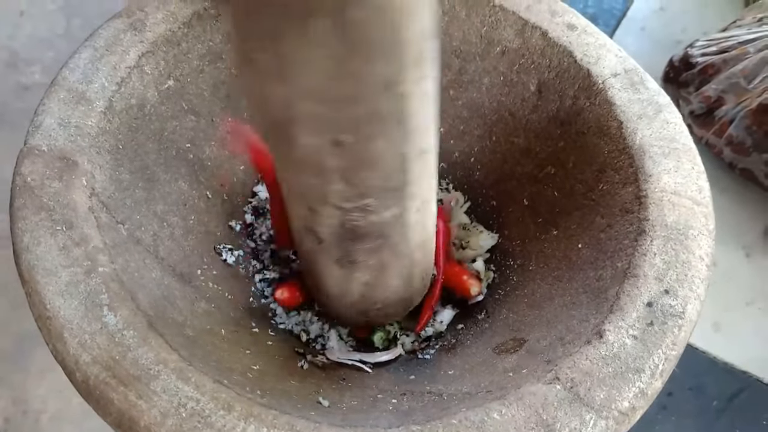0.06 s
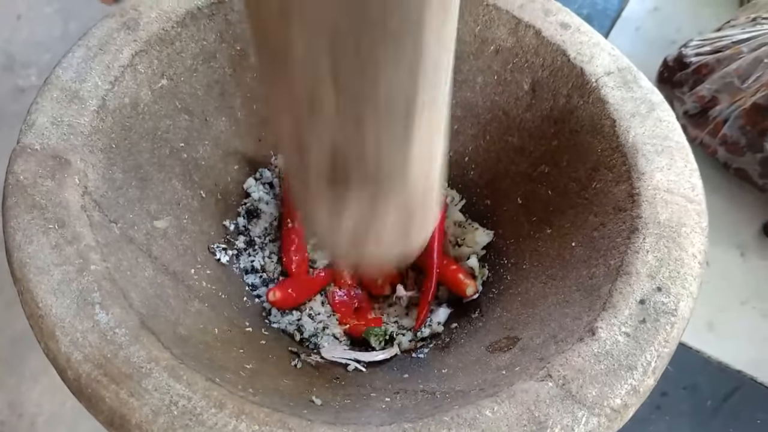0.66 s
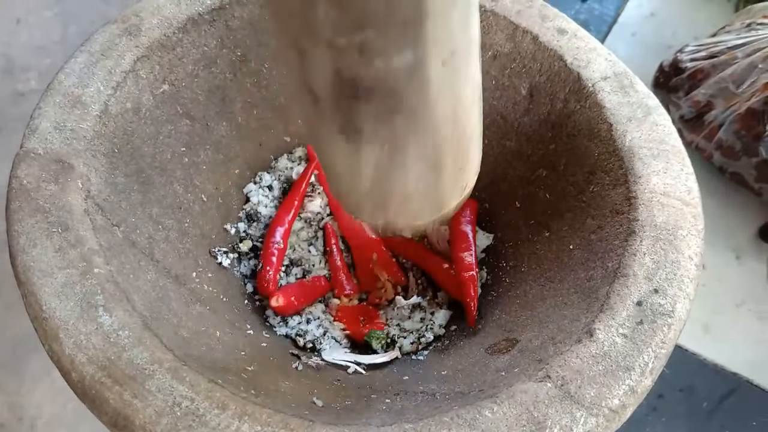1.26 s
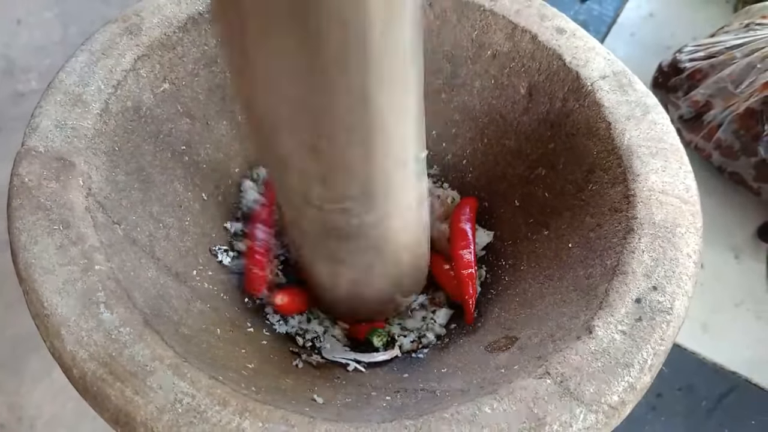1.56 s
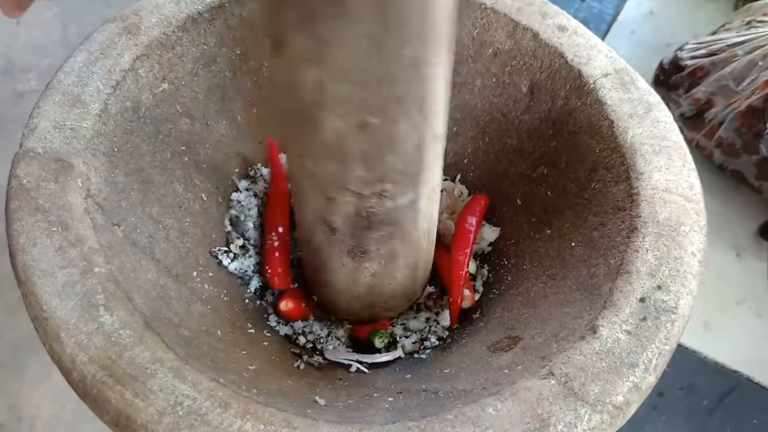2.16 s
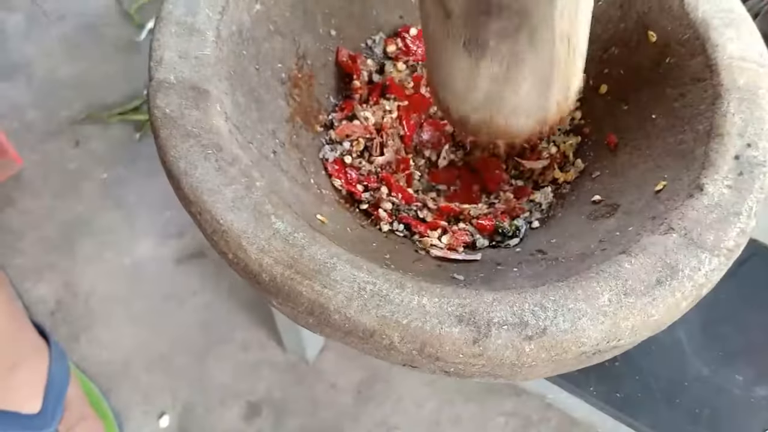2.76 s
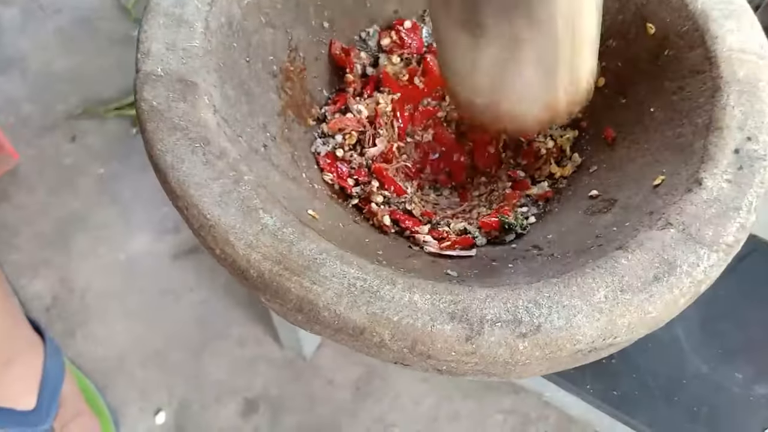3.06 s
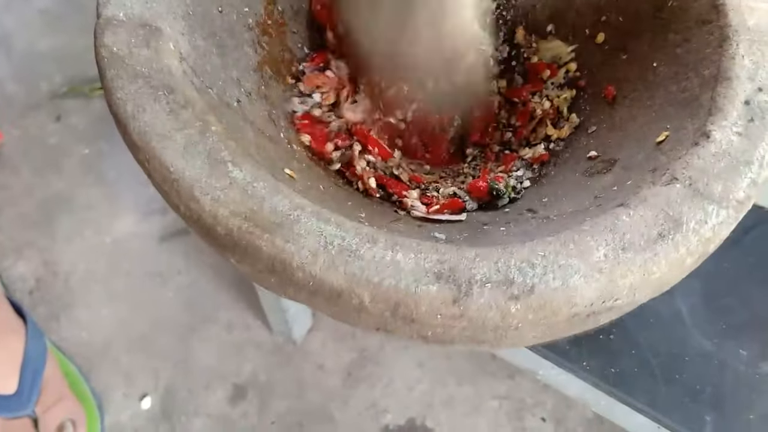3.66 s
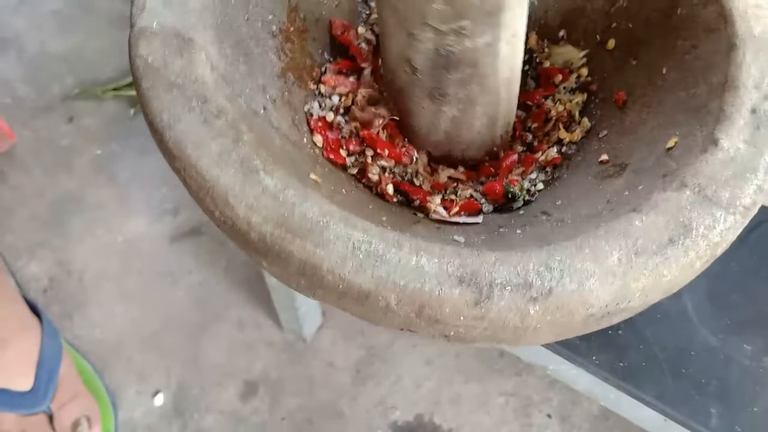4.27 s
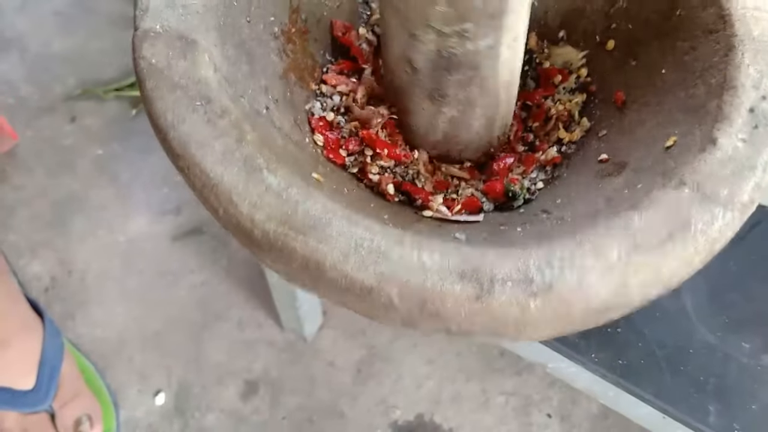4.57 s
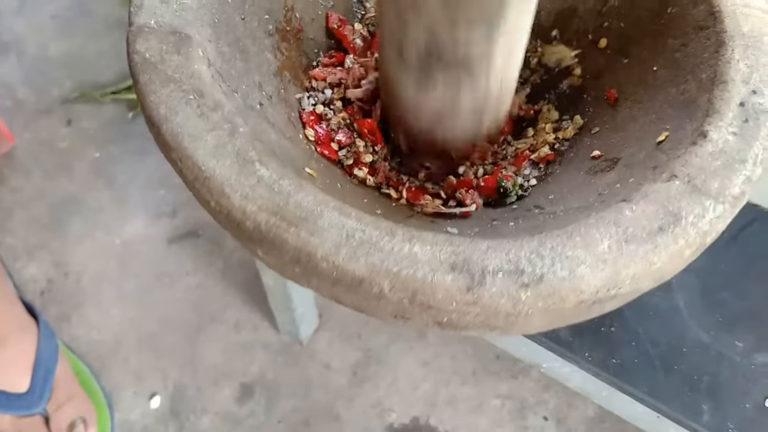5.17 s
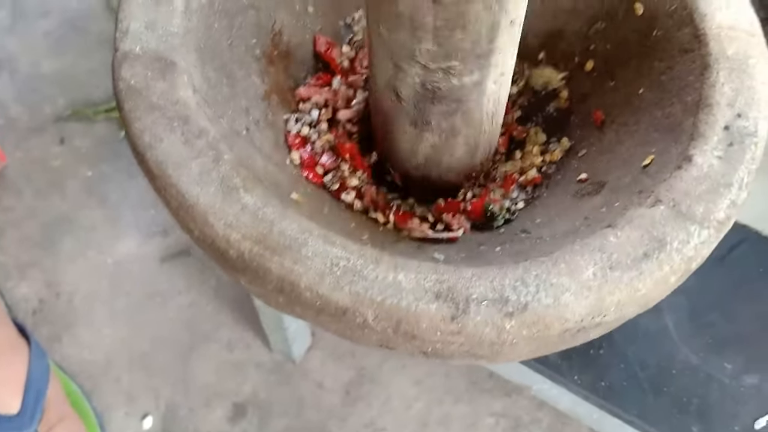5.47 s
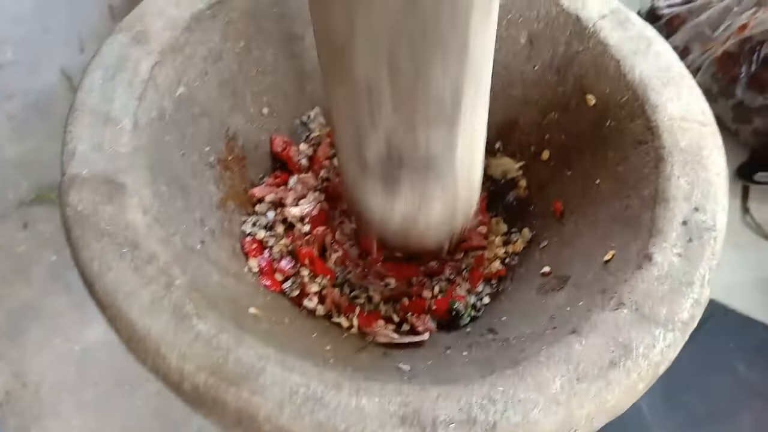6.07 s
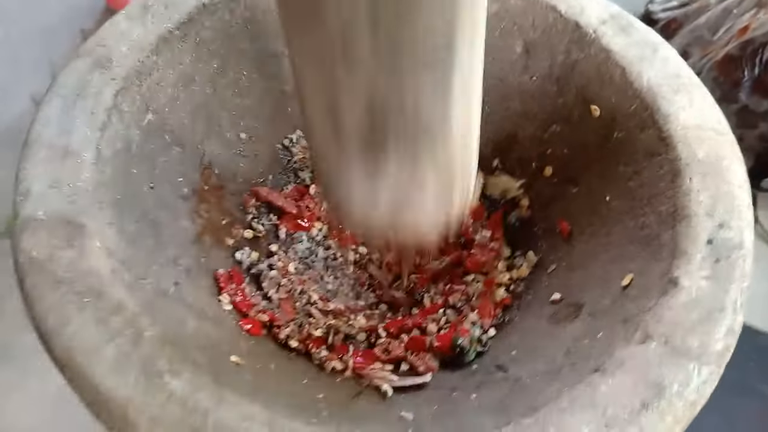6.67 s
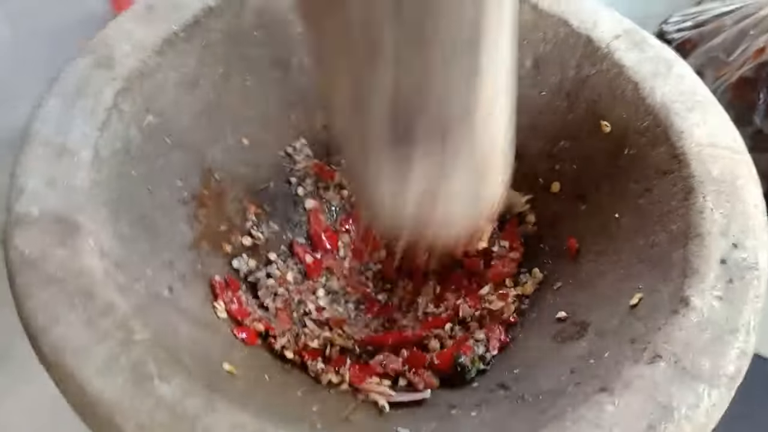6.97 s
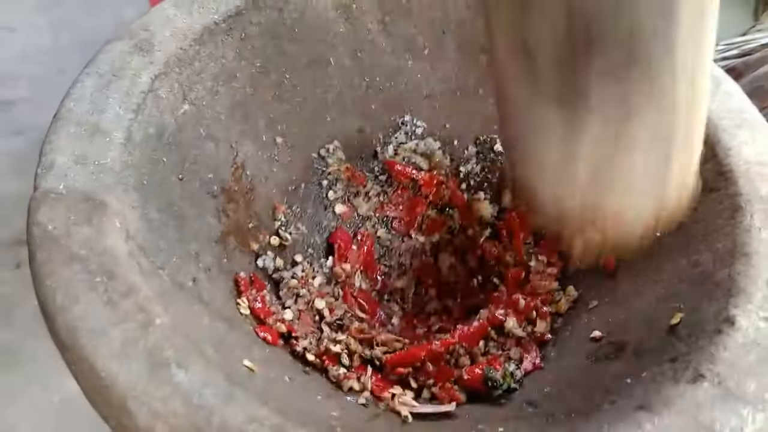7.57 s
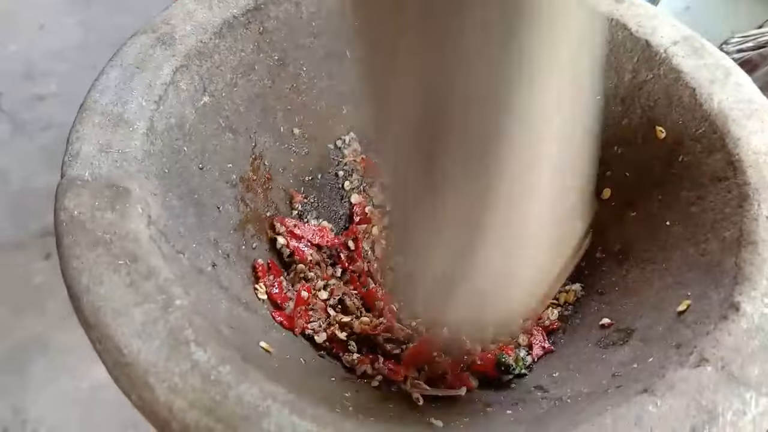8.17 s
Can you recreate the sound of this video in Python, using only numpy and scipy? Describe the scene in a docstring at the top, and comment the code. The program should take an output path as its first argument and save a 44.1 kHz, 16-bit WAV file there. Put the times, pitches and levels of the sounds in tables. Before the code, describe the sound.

Steady, quick thuds of a pestle in a stone mortar are heard up close, with a little kitchen echo. At first, chillies and garlic burst with juicy crunches while a faint bird whistles outdoors. From about three seconds in, the pulp squelches, smacks and crackles off the rising pestle. Some strokes clack on stone and others land cushioned. The wet pestle squeaks faintly once near six seconds, and the pounding carries on.

```python
"""A heavy pestle pounds chillies and garlic in a stone mortar, close by in an airy kitchen.
During the first second a bird whistles outside. Each stroke bursts the pulp with a wet crunch and a
dull thud, sinks through it and bottoms out. From 2.5 s the paste smacks as the pestle twists and lifts.
From 3.3 s the pods are mash: it crackles off the rising pestle, and the mortar rocks on its stand.
Near 6 s the wet pestle squeaks once."""
import sys
import numpy as np
from scipy import signal
from scipy.fft import rfft, irfft
from scipy.io import wavfile
from scipy.ndimage import uniform_filter1d

SR = 44100
rng = np.random.default_rng(int(sys.argv[2]) if len(sys.argv) > 2 else 0)


def dump(signal):
    """Clip the signal to [-1, 1] and save it as 16-bit WAV at the path in sys.argv[1]."""
    limited = np.clip(np.atleast_2d(signal).T, -1, 1)
    pcm = np.round(limited * 32767).astype(np.int16)
    wavfile.write(sys.argv[1], SR, pcm)


N = 367353
AGE_S = np.arange(SR // 3) / SR   # time since a contact
MASH_FROM_S = 3.3

# pestle strokes: start_s, thud_db, knock_db, clack_db, crunch_db, sink_s, bottom_re_landing_db
STROKES = [(0.066, -13, -17.5, -16, -24.5, 0.019, -10), (0.329, -20.5, -27, -31.5, -31, 0.022, -6.5),
           (0.612, -21, -47, -43, -25.5, 0.01, -13), (0.867, -21.5, -29, -33, -24.5, 0.014, -9),
           (1.132, -17, -21.5, -20.5, -24.5, 0.02, -44), (1.369, -20, -28.5, -32.5, -27.5, 0.041, -20),
           (1.643, -17, -22.5, -21, -23, 0.018, -19), (1.91, -18.5, -24.5, -27.5, -25, 0.02, -0.5),
           (2.176, -23, -35, -29.5, -25, 0.015, -18), (2.443, -25.5, -55, -26.5, -27.5, 0.012, -41),
           (2.708, -16, -25.5, -26, -25.5, 0.018, -15), (3.005, -16.5, -20.5, -21.5, -24.5, 0.007, 2),
           (3.402, -19, -27.5, -31.5, -21.5, 0.02, 0.5), (3.688, -16.5, -25, -30, -30.5, 0.027, -6.5),
           (3.964, -18, -20, -24.5, -25, 0.021, -9), (4.257, -23.5, -34, -36.5, -29, 0.027, 8.5),
           (4.544, -21.5, -34, -48, -29.5, 0.037, 4), (4.81, -17, -23, -27.5, -27, 0.024, -7),
           (5.102, -15, -23.5, -23.5, -33.5, 0.015, -5.5), (5.371, -17, -23, -21, -24, 0.0084, -37),
           (5.665, -27.5, -41.5, -67, -25.5, 0.013, 7), (5.959, -22, -38, -53, -28.5, 0.023, 4.5),
           (6.247, -16, -27, -39, -24, 0.018, -41.5), (6.542, -17, -21.5, -25.5, -23, 0.016, -18),
           (6.81, -18, -24.5, -54, -26.5, 0.02, -6.5), (7.109, -20.5, -32.5, -33.5, -23.5, 0.02, -1),
           (7.368, -18, -23.5, -25, -23, 0.039, -4), (7.638, -23.5, -25, -17, -51, 0.024, -7),
           (7.954, -16.5, -33, -31.5, -26, 0.033, -13), (8.22, -15.5, -21, -22, -28, 0.015, -9.5)]
# mortar on its stand: pitch_hz, level_db, t60_s
STAND_MODES = [(110.8, -33.5, 0.85), (131, -12, 0.32), (192.8, 1.5, 0.16), (202.6, 11.5, 0.084),
               (233.6, -0.5, 0.16)]
# hollow under the pestle: freq_hz, gain_db
SQUELCH_SPECTRUM = [(1300, -8.5), (2100, 0.5), (2900, 4), (4500, -15), (7000, -28)]
# spitting juice: freq_hz, gain_db
SPIT_SPECTRUM = [(1500, -1), (3600, -1), (4800, 4.5), (5800, 4), (6800, -13), (9300, -27.5), (11000, -19),
                 (11900, -22), (13100, -13), (15000, -28)]
# shading of the far microphone port: freq_hz, gain_db
PORT_SHADE = [(200, -2.5), (900, 2.5), (2700, -10), (3800, -17.5), (5500, -26.5), (8000, -12), (13000, -19)]


def from_db(db):
    return 10 ** (np.asarray(db) / 20)


def impulse_response(spectrum, size=1024):
    """Minimum-phase response of (freq_hz, gain_db) points, joined on a log-frequency axis."""
    hz, db = np.transpose(spectrum)
    gain_db = np.interp(np.log(np.fft.rfftfreq(size, 1 / SR) + 1), np.log(hz), db)
    cepstrum = irfft(np.log(from_db(gain_db)))
    cepstrum[1:size // 2] *= 2
    cepstrum[size // 2 + 1:] = 0
    return irfft(np.exp(rfft(cepstrum)))


def through(x, response):
    return signal.oaconvolve(x, response)[:len(x)]


def add(track, start_s, sound, level_db):
    """Mix in a sound with its loudest 3 ms at level_db."""
    start = max(round(start_s * SR), 0)
    peak = np.sqrt(2 * uniform_filter1d(sound ** 2, 130).max())
    track[start:start + len(sound)] += (from_db(level_db) * sound / peak)[:max(N - start, 0)]


def waver(progress, knots):
    """Random line segments over progress 0..1."""
    return np.interp(progress, np.linspace(0, 1, knots), rng.standard_normal(knots))


def grains(spread_db):
    """Tiny fractures of uneven size; rms 1."""
    x = rng.standard_normal(len(AGE_S)) * from_db(spread_db * rng.standard_normal(len(AGE_S)))
    return x / x.std()


def ringing(modes, scatter_db, detune, phase_rad=0):
    """Decaying modes; strength and pitch vary with the spot struck and the pestle's load."""
    hz, db, t60_s = np.transpose(modes)[:, :, None]
    hz = hz * (1 + detune * rng.standard_normal(hz.shape))
    db = db + scatter_db * rng.standard_normal(db.shape)
    return np.sum(from_db(db - 60 * AGE_S / t60_s) * np.cos(2 * np.pi * hz * AGE_S + phase_rad), axis=0)


def echo_cloud(t60_s, build_s=0.0015):
    """Dense echoes that build and die away, no one pitch standing far out; unit energy."""
    envelope = from_db(-60 * AGE_S / t60_s) * (1 - np.exp(-(AGE_S / build_s) ** 2))
    spectrum = rfft(rng.standard_normal(len(AGE_S)) * np.sqrt(envelope))
    flattened = spectrum / np.sqrt(np.abs(spectrum) + 1e-9)
    echoes = irfft(flattened, len(AGE_S)) * np.sqrt(envelope)
    return echoes / np.linalg.norm(echoes)


def two_ports(left, other, alike_below_hz, apart_db):
    """Two close ports share most of a diffuse field's bass and differ in its treble."""
    bass = signal.butter(1, alike_below_hz, fs=SR)
    treble = signal.butter(1, alike_below_hz, "high", fs=SR)
    return left, signal.lfilter(*bass, left + from_db(apart_db) * other) + signal.lfilter(*treble, other)


def background(level_db=-58.5):
    """Steady low noise; being diffuse, it is shaded by half as many dB at the far port."""
    # kitchen air: freq_hz, gain_db
    air_spectrum = [(18, -18), (30, -9.5), (195, -12), (274, -25.5), (538, -25), (1440, -29.5), (2490, -27),
                    (5580, -38.5), (9390, -54.5), (15000, -51)]
    colour = impulse_response(air_spectrum, size=8192)
    noises = [through(rng.standard_normal(N), colour) for _ in range(2)]
    left, right = two_ports(*noises, alike_below_hz=540, apart_db=-8)
    half_shade = impulse_response([(hz, db / 2) for hz, db in PORT_SHADE])
    air = np.array([left, through(right, half_shade)])
    return from_db(level_db) * air / air.std()


def bird(waver_hz=45, overtone_db=-24, yard_t60_s=0.29):
    """Wavering whistles slide and settle on a pitch, smeared by yard echoes."""
    # whistles: start_s, length_s, start_hz, end_hz, level_db
    notes = [(0.137, 0.044, 2810, 2140, -44), (0.353, 0.093, 2646, 2463, -46),
             (0.45, 0.075, 3450, 4160, -46), (0.507, 0.1, 2410, 2317, -39),
             (0.721, 0.02, 4580, 3290, -45.5), (0.735, 0.032, 2730, 2623, -40),
             (0.83, 0.095, 3580, 4070, -47.5), (0.922, 0.079, 2250, 2457, -39)]
    out = np.zeros(N)
    for start_s, length_s, start_hz, end_hz, level_db in notes:
        progress = np.minimum(AGE_S / length_s, 1)
        pitch_hz = end_hz + (start_hz - end_hz) * (1 - progress) ** 2 + waver_hz * waver(progress, 60)
        phase = 2 * np.pi * np.cumsum(pitch_hz) / SR
        tone = np.sin(phase) + from_db(overtone_db) * np.sin(2 * phase)
        add(out, start_s, np.sin(np.pi * progress) * tone, level_db)
    return out + through(out, echo_cloud(yard_t60_s))


def reflections(early_t60_s=0.097, late_t60_s=0.29):
    """Early cloud from bowl, floor and near wall; weaker tail from the room."""
    # reflected sound: freq_hz, early_db, late_db
    echo_spectra = [(205, -11, -16), (343, 7, -4.5), (825, -1.5, -9), (2250, -8.5, -9.5),
                    (13600, -6.5, -15)]
    early = impulse_response([(hz, db) for hz, db, _ in echo_spectra])
    late = impulse_response([(hz, db) for hz, _, db in echo_spectra])
    return through(echo_cloud(early_t60_s), early) + through(echo_cloud(late_t60_s), late)


def room(dry, stretches=10):
    """The hand-held microphone wanders, so each stretch has its own reflections."""
    wet = np.zeros((2, N + len(AGE_S)))
    for stretch in np.array_split(np.arange(N), stretches):
        responses = two_ports(reflections(), reflections(), alike_below_hz=640, apart_db=-6)
        for side, response in zip(wet, responses):
            echoes = signal.fftconvolve(dry[stretch], response)
            side[stretch[0]:stretch[0] + len(echoes)] += echoes
    return wet[:, :N]


def squeak(start_s=6.068, length_s=0.041, pitch_hz=2550, waver_hz=90, level_db=-42):
    """The wet pestle squeaks once against the bowl."""
    out = np.zeros(N)
    progress = np.minimum(AGE_S / length_s, 1)
    phase = 2 * np.pi * np.cumsum(pitch_hz + waver_hz * waver(progress, 20)) / SR
    add(out, start_s, np.sin(np.pi * np.sqrt(progress)) * np.sin(phase), level_db)
    return out


def peeling(level_db=-38, lag_s=0.042, peel_s=0.075, clump_db=7):
    """Mash crackles in clumps as it peels off the rising pestle."""
    out = np.zeros(N)
    squelch, spit = impulse_response(SQUELCH_SPECTRUM), impulse_response(SPIT_SPECTRUM)
    patter = squelch / squelch.std() + from_db(-9.5) * spit / spit.std()
    for start_s, *_ in STROKES:
        clumps = uniform_filter1d(rng.standard_normal(len(AGE_S)), size=300)
        envelope = from_db(clump_db * clumps / clumps.std()) * np.exp(-(AGE_S / peel_s) ** 2)
        crackle = np.tanh(grains(spread_db=15) / 10) * envelope
        if start_s > MASH_FROM_S:
            add(out, start_s + lag_s, through(crackle, patter), level_db)
    return out


def stand_thud(cushion_s, scatter_db, detune):
    """A cushioned push rings the mortar on its stand."""
    push = np.exp(-.5 * (AGE_S / cushion_s - np.pi) ** 2)
    return through(push, ringing(STAND_MODES, scatter_db, detune))


def rocking(settle_s=0.1, re_stroke_db=-24):
    """Pounding the mash tips the mortar; it settles back with a faint thud."""
    out = np.zeros(N)
    for start_s, thud_db, *_ in STROKES:
        thud = stand_thud(cushion_s=0.00052, scatter_db=2, detune=0.015)
        lag_s = settle_s * (1 + 0.151 * rng.standard_normal())
        if start_s > MASH_FROM_S:
            add(out, start_s + lag_s, thud, thud_db + re_stroke_db)
    return out


def bursts(squeeze_decay_s=0.0017, smack_decay_s=0.0011):
    """Pulp bursts (longer if deep), oozes, smacks; yields peak_s, squelch_db, spit_db, decay_s."""
    # paste squirts out or smacks as the pestle twists free: peak_s, level_db
    smacks = [(2.502, -37), (3.708, -22), (3.809, -37), (4.056, -35), (4.275, -19), (4.569, -19.5),
              (4.638, -27.5), (4.911, -40), (5.115, -22), (5.149, -28), (5.431, -30.5), (5.735, -35),
              (5.969, -23.5), (6.075, -37), (6.292, -34), (6.822, -18.5), (6.897, -30), (7.38, -19),
              (7.977, -19.5), (8.035, -31.5), (8.107, -40.5), (8.233, -20.5), (8.305, -32.5)]
    # ahead_s, squelch_re_spit_db, squeeze_re_crunch_db
    pods, mash = (0.0055, 0, -17), (0.003, 3.2, -10)
    for start_s, _, _, _, crunch_db, sink_s, _ in STROKES:
        ahead_s, squelch_re_spit_db, squeeze_re_crunch_db = mash if start_s > MASH_FROM_S else pods
        yield start_s - ahead_s, crunch_db + squelch_re_spit_db, crunch_db, 0.13 * sink_s
        squeeze_db = crunch_db + squeeze_re_crunch_db
        yield start_s + 0.8 * sink_s, squeeze_db + squelch_re_spit_db, squeeze_db, squeeze_decay_s
    for peak_s, level_db in smacks:
        yield peak_s, level_db, level_db - 7, smack_decay_s


def crushing(pod_rise_s=0.0016, mash_rise_s=0.00067, lead_s=0.01, ooze_s=0.018, dulling_db_per_s=1.25):
    """Skins give in a swell of fractures: the hollow under the pestle squelches, the juice spits."""
    out, squelch = np.zeros(N), impulse_response(SQUELCH_SPECTRUM)
    before_s, after_s = np.minimum(AGE_S - lead_s, 0), np.maximum(AGE_S - lead_s, 0)
    ooze = from_db(-15) * np.exp(-(after_s / ooze_s) ** 2)   # juice fizzes while the pestle sinks
    for peak_s, squelch_db, spit_db, decay_s in bursts():
        crisp_db = 10 - dulling_db_per_s * peak_s   # top octave fades as pods turn to paste
        spit = impulse_response([(hz, db + crisp_db * (hz > SR / 5)) for hz, db in SPIT_SPECTRUM])
        swell = np.exp(before_s / (mash_rise_s if peak_s > MASH_FROM_S else pod_rise_s))
        burst = np.exp(-after_s / decay_s)
        fractures = swell * (burst + ooze / 2) * grains(spread_db=9.5)
        spray = swell * (burst + ooze) * grains(spread_db=10.5)
        add(out, peak_s - lead_s, through(fractures, squelch), squelch_db)
        add(out, peak_s - lead_s, through(spray, spit), spit_db)
    return out


def contacts():
    """Strokes land, then bottom out harder-edged; yields start_s, thud_db, knock_db, clack_db."""
    # pestle brushes the bowl between strokes: start_s, level_db
    taps = [(3.186, -45), (6.927, -32.5)]
    for start_s, thud_db, knock_db, clack_db, _, sink_s, bottom_db in STROKES:
        yield start_s, thud_db, knock_db, clack_db
        yield start_s + sink_s, thud_db + bottom_db - 2.5, knock_db + bottom_db, clack_db + bottom_db + 5
    for start_s, level_db in taps:
        yield start_s, level_db, level_db - 3, level_db - 7


def pounding(thud_lead_s=0.00087, knock_lag_s=0.0012, grit_decay_s=0.0041, clack_decay_s=0.013):
    """Pulp cushions the push on the mortar; then the pestle strikes stone and grinds through grit."""
    # bowl and pestle: pitch_hz, level_db, t60_s
    bowl_modes = [(372, -12, 0.028), (465.5, -3.5, 0.019), (572.5, -3, 0.029), (588, -6, 0.052),
                  (688.3, -4, 0.033), (773.4, -7, 0.03), (915, -9, 0.019), (995, -8, 0.021),
                  (1070, -13.5, 0.029), (1253, -14.5, 0.037)]
    # stone on stone: freq_hz, gain_db
    clack_spectrum = [(500, 2), (1100, 5.5), (2300, 8.5), (3000, -6), (4200, -10.5), (15000, -49)]
    out, clack = np.zeros(N), impulse_response(clack_spectrum)
    thud = stand_thud(cushion_s=0.00057, scatter_db=2.5, detune=0)
    phase_rad = np.pi * (np.arange(len(bowl_modes))[:, None] + .5)   # adjacent modes in antiphase
    for start_s, thud_db, knock_db, clack_db in contacts():
        add(out, start_s - thud_lead_s, thud, thud_db)
        strike = (AGE_S == 0) + 0.15 * grains(spread_db=1.5) * np.exp(-AGE_S / grit_decay_s)
        bowl = ringing(bowl_modes, scatter_db=2, detune=0.012, phase_rad=phase_rad)
        add(out, start_s + knock_lag_s, through(strike, bowl), knock_db)
        crack = (AGE_S == 0) + 0.11 * grains(spread_db=2.5) * np.exp(-AGE_S / clack_decay_s)
        add(out, start_s, through(crack, clack), clack_db)
    return out


def scene():
    """Mortar and bird in the room, at a near and a shaded port, over quiet air."""
    direct = pounding() + rocking() + crushing() + peeling() + squeak() + bird()
    left, right = direct + room(direct)
    return np.array([left, through(right, impulse_response(PORT_SHADE))]) + background()


def record(dry):
    """Band limit, 72 Hz to 15 kHz."""
    highpass = signal.butter(3, 72, "high", fs=SR, output="sos")
    lowpass = signal.ellip(10, .1, 80, 15000, fs=SR, output="sos")
    return signal.sosfilt(lowpass, signal.sosfilt(highpass, dry))


dry = scene()
out = record(dry)
dump(out)
```